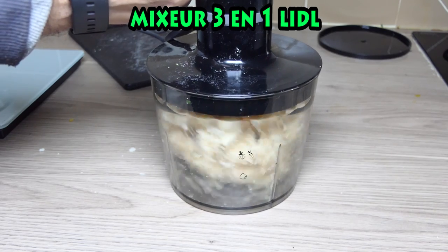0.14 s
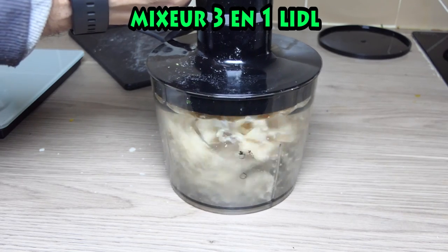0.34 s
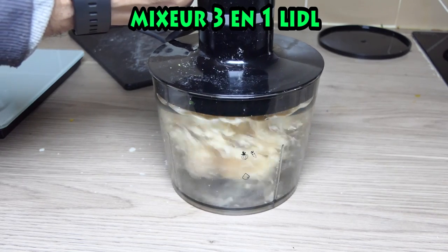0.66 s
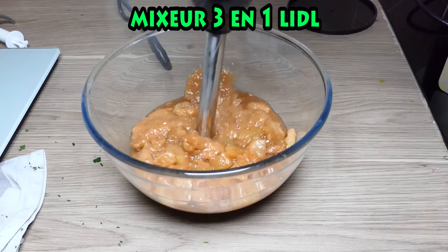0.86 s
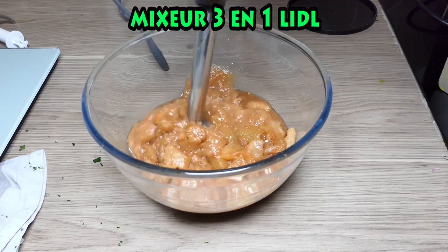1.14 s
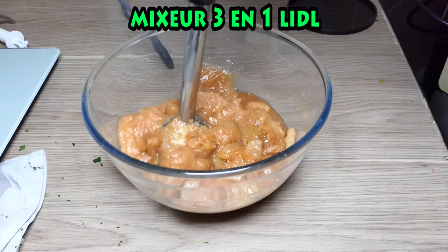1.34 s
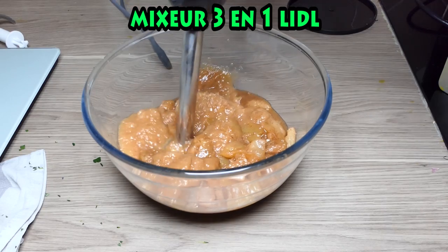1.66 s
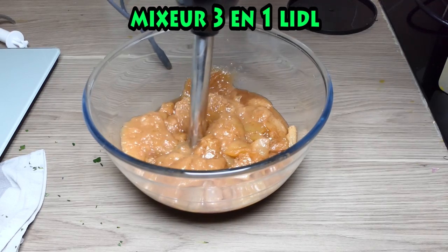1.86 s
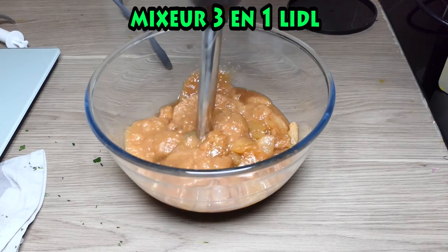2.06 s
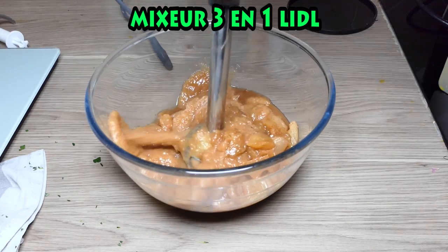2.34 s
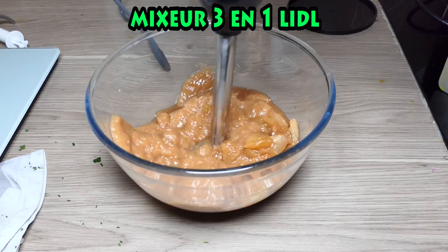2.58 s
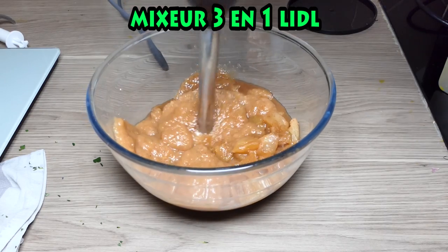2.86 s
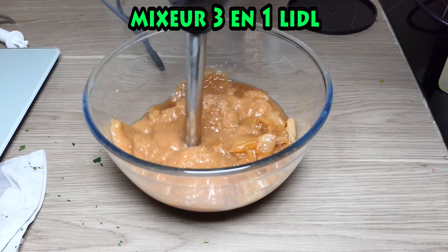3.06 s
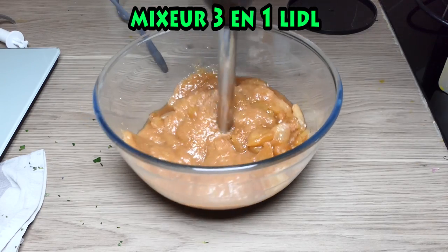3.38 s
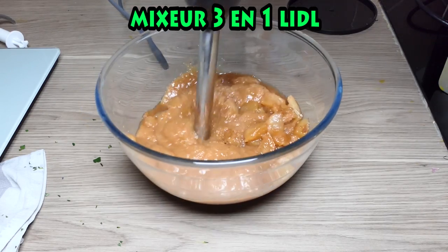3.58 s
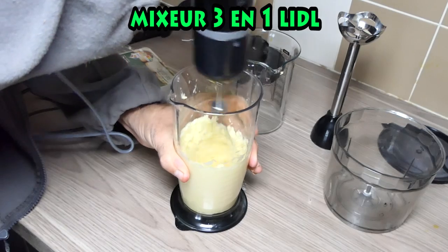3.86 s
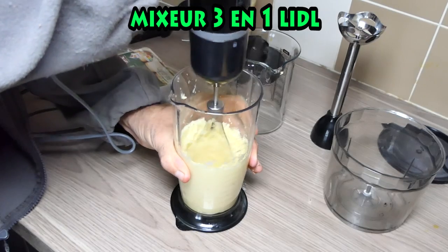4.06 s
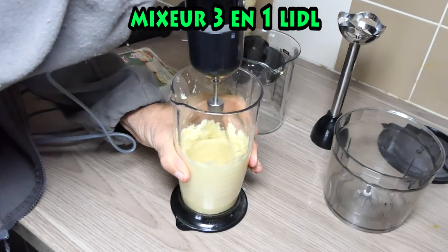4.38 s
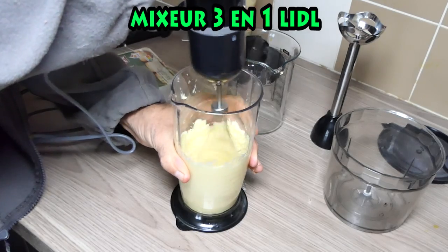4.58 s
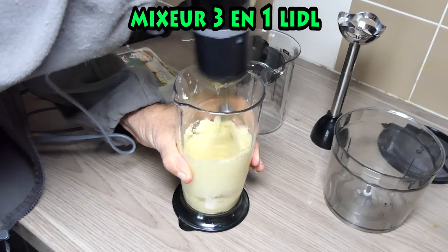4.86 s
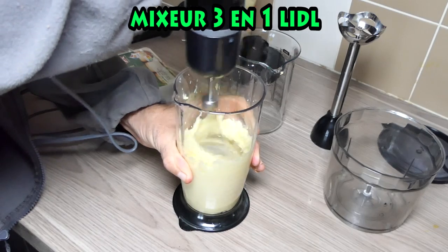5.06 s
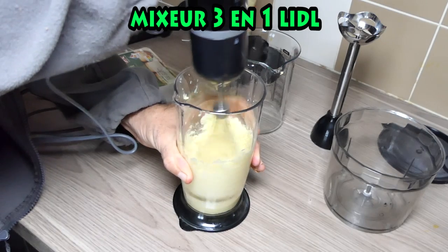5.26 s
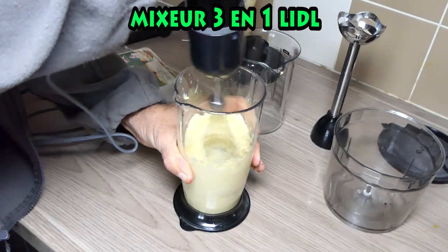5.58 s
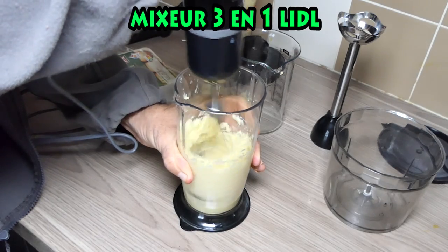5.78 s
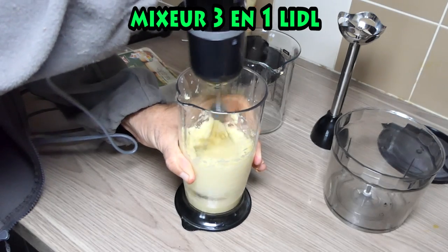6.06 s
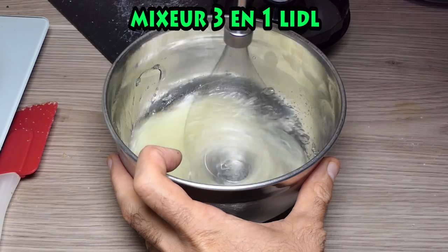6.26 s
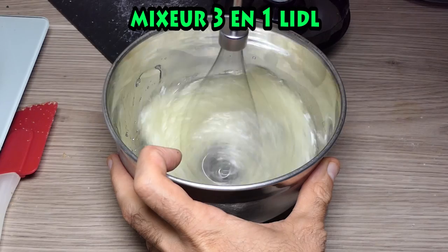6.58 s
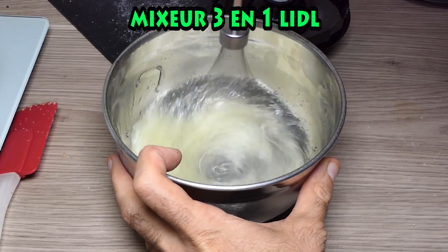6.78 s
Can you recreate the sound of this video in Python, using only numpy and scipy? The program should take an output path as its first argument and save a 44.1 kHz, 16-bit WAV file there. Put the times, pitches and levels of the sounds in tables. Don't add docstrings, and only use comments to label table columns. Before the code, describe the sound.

Food pieces clatter loudly in a plastic chopper, a hand blender grinds and spits through puree, then a geared whisk whines in a beaker and scrapes steel.

```python
import sys
import numpy as np
from scipy import signal
from scipy.fft import rfft, irfft, next_fast_len
from scipy.io import wavfile
from scipy.ndimage import minimum_filter1d, map_coordinates

SR = 44100
rng = np.random.default_rng(int(sys.argv[2]) if len(sys.argv) > 2 else 0)


def natural_amplitude(level_db):
    exponent = np.asarray(level_db, float) / 20
    return 10 ** exponent


def store_pcm(level_fs):
    pcm = np.round(np.clip(level_fs, -1, 1) * 32767).astype(np.int16)
    wavfile.write(sys.argv[1], SR, np.atleast_2d(pcm).T)


N = 305745
T = np.arange(N) / SR

# [f/Hz, width/Hz, level/dB]
GLASS_MODES = [(777, 59, -2.5), (870, 39, 1), (907, 60, -2.5), (1170, 84, -5), (1380, 126, -5),
               (1663, 84, -6), (2044, 155, -12.5)]


def chopper():
    # [f/Hz, level/dB per Hz]
    tumble_spectrum = [(35, -50), (60, -42), (227, -11.5), (550, -14.5), (897, -3.5), (1010, -8.5),
                       (1810, -5), (2330, -5.5), (2950, -5.5), (3310, -9.5), (3630, -21.5), (4920, -19),
                       (6210, -27.5), (9900, -30), (15800, -51)]
    # [f/Hz, width/Hz, level/dB]
    lid_modes = [(954, 12, -5.5), (2010, 106, -4.5), (2310, 36, 6.5), (2480, 100, 1.5), (2750, 110, -7),
                 (3230, 95, -2.5), (4600, 1200, -14), (5440, 240, -12.5)]
    # [t/s, peak level/dB, brightness over peak/dB]
    wall_hits = [(0.0443, -9.5, -25), (0.1151, -30, -11.5), (0.131, -7, -9), (0.177, -8.5, -20),
                 (0.2087, -5, -5), (0.2483, -18, -5), (0.2777, -14, -17), (0.305, -10.5, -24),
                 (0.3434, -10, -38), (0.368, -7, -2), (0.386, -7, -34), (0.4232, -15, -17),
                 (0.4354, -18, -2), (0.5053, -8, -20.5), (0.5557, -5.5, -11), (0.61, -11.5, -5),
                 (0.6655, -9.5, -41), (0.683, -8, -43), (0.756, -14, -13), (0.826, -11.5, -4),
                 (0.8684, -13.5, -24), (.006, -6.5, -13), (.0144, -13, -7.5), (.054, -11, -16),
                 (.143, -8, -17), (.152, -19, 4), (.162, -18, -17), (0.219, -14.5, -15), (.3117, -14, -7),
                 (.329, -12.5, -17), (0.401, -21, -18), (.444, -13, -20), (0.461, -13.5, -12),
                 (.484, -10.5, -14), (0.5206, -16, -2), (.531, -10.5, -14), (.541, -12, -19),
                 (.569, -13.5, -10), (0.58, -10, -6), (0.635, -10, -16), (.711, -22, -5), (.73, -18, -15),
                 (.768, -12.5, -12), (.779, -13.5, -9), (0.796, -17, -16), (0.81, -18.5, -19),
                 (.837, -16, -17)]
    # [t/s, length/s, bowl level/dB, rattle level/dB]
    load_shifts = [
        (0, 0.0068, -20, -11),
        (.044, 0.031, -19, -2.5),
        (.09, 0.026, -22.5, -10),
        (.74, 0.017, -27.5, -6),
        (.765, 0.078, -17.5, -8),
        (.84, .06, -21, -11),
    ]
    bowl_db, rattle_db = spells(load_shifts, [-19.5, -9], edge_s=0.011)
    blows = impulses([(s, db) for s, db, _ in wall_hits], gain_db=5.5)
    bright = impulses([(s, db + bright_db) for s, db, bright_db in wall_hits], gain_db=-1.5)
    lumps = natural_amplitude(0.42 * wobble(35) + 1.9 * wobble(250))

    tumble = natural_amplitude(bowl_db - 4.0) * rush(lumps, lambda hz: natural_amplitude(along(tumble_spectrum, hz)))
    shaken = natural_amplitude(bowl_db - 6.5) * lumps + 0.27 * dying(blows, 0.024)
    ring = natural_amplitude(-24.5) * rush(shaken, lambda hz: modes(lid_modes, hz))
    knock = 10 * filtered(blows, lambda hz: modes(lid_modes, hz))

    def treble(hz):
        return natural_amplitude(along(tumble_spectrum, hz) + 3.0 * np.log2(hz / 4000 + .01)) * (hz > 3500)

    rattle_level = natural_amplitude(bowl_db + rattle_db - 3.0) * lumps + 0.46 * dying(bright, 0.025)
    return tumble + ring + knock + rush(1, treble) * rattle_level


def blade():
    # [t/s, speed/turns per second]
    shaft_speed = [(.89, 202.3), (1.12, 202), (1.45, 198.3), (1.75, 199), (1.9, 201.6), (2.15, 202.6),
                   (2.7, 199), (3.2, 201.5), (3.45, 203)]
    turns = np.cumsum(curves(shaft_speed)[0]) / SR
    return under_puree(turns) + motor_whine(turns) + at_surface(turns)


def tip_passes(turns, depth_db):
    return natural_amplitude(depth_db * (np.cos(4 * np.pi * turns) + 0.095 * np.cos(2 * np.pi * turns)))


def under_puree(turns):
    # [f/Hz, level/dB per Hz]
    grind_spectrum = [(35, -86), (60, -35), (193, -18.5), (307, -13.5), (370, -15), (501, -17),
                      (603, -21.5), (762, 0.5), (1030, -17.5), (1640, -5.5), (4080, -31.5), (8810, -30),
                      (9900, -20.5), (14700, -56), (15800, -53.5)]
    # [f/Hz, width/Hz, level/dB]
    boom_modes = [(150, 7.5, -17), (263.3, 12, -7.5), (383, 18.7, 3.5), (581, 6.8, -10)]
    # [t/s, peak level/dB]
    hard_bits = [
        (1.308, -13),
        (1.47, -3),
        (1.527, -11),
        (1.595, -12),
        (1.969, -2),
        (2.089, -18),
        (2.129, -10),
        (2.825, -23),
        (3.142, -6),
    ]
    # [t/s, length/s, grind level/dB]
    foot_moves = [
        (1.235, 0.027, -19.5),
        (1.28, 0.018, -26.5),
        (2.27, 0.1, -25),
        (2.4, 0.075, -28.5),
        (3.47, 0.015, -26),
        (3.68, .06, -22),
    ]
    # [t/s, length/s, boom level/dB]
    bowl_presses = [
        (.95, 0.02, -32.5),
        (1.14, .04, -34),
        (1.22, 0.077, -43),
        (1.54, 0.12, -31.5),
        (2.1, 0.11, -35.5),
        (2.25, 0.054, -28.5),
        (2.5, 0.4, -36.5),
        (3.5, 0.077, -45.5),
        (3.72, .03, -47),
    ]
    grind_db = spells(foot_moves, [-23.5], edge_s=0.0156)[0]
    boom_db = spells(bowl_presses, [-37], edge_s=0.037)[0]
    lumps = natural_amplitude(2.4 * wobble(29.94) + 0.61 * wobble(220))

    def glass_ring(hz):
        return modes(GLASS_MODES, hz) * hz ** 2 / (hz ** 2 + 650 ** 2)

    cutting = 0.5 * rush(lumps, lambda hz: natural_amplitude(along(grind_spectrum, hz)))
    cutting = cutting + 0.97 * rush(lumps * tip_passes(turns, 2.74), glass_ring)
    grind = 0.96 * cutting + natural_amplitude(-4) * nicks(turns)
    boom = rush(1, lambda hz: modes(boom_modes, hz))
    struck = impulses(hard_bits, gain_db=32)
    thuds = filtered(struck, lambda hz: modes(GLASS_MODES, hz) / (1 + 1j * hz / 3000) ** 3)
    return natural_amplitude(grind_db) * grind + thuds + natural_amplitude(boom_db + 1.0) * boom


def nicks(turns):
    jitter_s, scatter_db = .0006, 3.5
    at = np.flatnonzero(np.diff(np.floor(turns)))
    draw = rng.standard_normal((len(at), 2))
    late = (jitter_s * SR * draw[:, 0]).astype(int)
    push = np.zeros(N)
    push[np.clip(at + late, 0, N - 1)] = natural_amplitude(scatter_db * draw[:, 1])

    def response(hz):
        snap = 1j * hz * 1300 / (1200 ** 2 - hz * hz + 1j * hz * 1300)
        return snap * (0.6 + 1.1 * modes(GLASS_MODES, hz)) / (1 + 1j * hz / 3300) ** 4

    return unit(filtered(push, response))


def motor_whine(turns):
    orders = [
        2,
        36,
        60,
        72,
        73,
    ]
    # [level/dB, phase blur/rad]
    partials = [
        (-46, .3),
        (-53.5, .35),
        (-66, .5),
        (-58, .4),
        (-61, .4),
    ]
    whine = 0
    for k, (db, blur) in zip(orders, partials):
        whine = whine + natural_amplitude(db + 3 * wobble(9.0)) * tone(k * turns, blur)
    sing_db = np.interp(T, [1.55, 1.7, 1.9, 2, 2.5, 3, 3.7], [-42, -33, -35.5, -37, -56.5, -31.5, -28.5])
    sing = natural_amplitude(sing_db) * tone(4 * turns + 0.78 * wobble(9), 0.32)
    hiss_db = np.interp(T, [2, 3], [-45, -50])
    hiss = rush(tip_passes(turns, 2.0), lambda hz: modes([(9750, 490, 0)], hz) ** 2)
    return whine + sing + natural_amplitude(hiss_db) * hiss


def at_surface(turns):
    # [f/Hz, width/Hz, level/dB]
    slurp_modes = [(2700, 480, -4.5), (3350, 185, 4.5), (3970, 520, -6), (4900, 750, -12)]
    # [f/Hz, level/dB per Hz]
    spray_spectrum = [(1470, -12), (2500, 0.5), (3940, -0.5), (4710, -0.5), (6120, -4.5), (7420, 0),
                      (9710, -2), (12700, -12), (14300, -19), (15800, -24.5)]
    # [t/s, peak level/dB, f/Hz]
    spits = [(0.9422, -29, 2630), (1.4097, -20, 2510), (1.6401, -17, 4000), (1.7205, -17, 4630),
             (1.9978, -25, 3200), (2.0268, -32, 3220), (2.2273, -20, 3640), (2.2508, -10, 7400),
             (2.4059, -14, 4100), (2.4538, -6.5, 4650), (2.5441, -23, 2650), (2.6179, -10, 3640),
             (2.6379, -2.5, 3770), (2.7042, -23, 3230), (2.9976, -16, 3310), (3.1881, -21, 3400),
             (3.3822, -15, 3360), (3.483, -24, 3300), (3.5314, -17.5, 3380), (3.585, -20, 3200),
             (3.5573, -22, 3570), (3.6346, -19, 3300), (3.665, -19, 3420), (3.7179, -16, 3580)]
    # [t/s, length/s, slurp level/dB, spray level/dB]
    gulps = [(1.23, 0.047, -34, -33.5), (1.4, 0.071, -45, -32.5), (1.63, .015, -40, -49),
             (1.715, .015, -48, -36), (1.805, 0.098, -26.5, -39), (2.25, 0.44, -35, -30),
             (2.5, 0.2, -37, -29), (2.68, 0.29, -28, -41.5), (3.01, 0.059, -30, -39.5),
             (3.17, 0.1, -26.5, -37.5), (3.405, .03, -30.5, -52), (3.49, 0.052, -30, -47),
             (3.57, 0.032, -29.5, -35.5), (3.63, 0.014, -27, -38), (3.68, 0.06, -26, -38)]
    slurp_db, spray_db = spells(gulps, [-43.5, -46.5], edge_s=0.026)

    def pocket(hz):
        return modes(slurp_modes, hz) * hz ** 4 / (hz ** 4 + 2300 ** 4)

    slurp = rush(tip_passes(turns, 2.3) * natural_amplitude(2.6 * wobble(60)), pocket)
    flung = tip_passes(turns, 3.0) * natural_amplitude(2.0 * wobble(45) + 3.5 * wobble(500))
    spray = rush(flung, lambda hz: natural_amplitude(along(spray_spectrum, hz)))
    drops = 0.7 * ticks(spits, t60=0.025, low_hz=1800, high_hz=12700)
    return natural_amplitude(slurp_db - 1.0) * slurp + natural_amplitude(spray_db + 2.0) * spray + drops


def whisk():
    # [t/s, f/Hz]
    mesh_rate = [(3.95, 2015), (3.99, 1980), (4.012, 1945), (4.026, 2000), (4.12, 1952), (4.15, 1995),
                 (4.19, 1975), (4.22, 2001), (4.35, 2003), (4.6, 1985), (4.8, 1981), (5.2, 1986),
                 (5.6, 1986), (6, 1975), (6.34, 1984)]
    ratios = [
        .1194,
        .674,
        1.12,
        3,
        4,
        5,
    ]
    # [level/dB, phase blur/rad]
    partials = [
        (-56, .3),
        (-38.5, .55),
        (-44, .4),
        (-39, 1.2),
        (-43.5, 1.3),
        (-54, 1.2),
    ]
    # [f/Hz, level/dB per Hz]
    whirr_spectrum = [(35, -80), (60, -45), (232, -24.5), (322, -23.5), (856, -17.5), (1330, -11),
                      (1800, -7), (2390, -12.5), (3300, -12.5), (4000, -10.5), (5000, -14.5), (9900, -15.5),
                      (14400, -32), (15800, -34)]
    # [f/Hz, width/Hz, level/dB]
    shell_modes = [(654, 63, -11), (1286, 72, -2), (1624, 39, 0.5), (2133, 51, -2)]
    # [t/s, peak level/dB, f/Hz]
    wire_ticks = [(3.8866, -22.5, 4010), (3.9355, -21, 4470), (4.4247, -15.5, 5970), (4.721, -15.5, 5870),
                  (4.8104, -18, 5800), (4.845, -8, 3350), (4.86, -7, 7610), (4.8792, -13, 3260),
                  (4.95, -13, 7300), (4.9668, -9, 9750), (5.0182, -16, 5800), (5.084, -25, 5950),
                  (5.1124, -14, 5280), (5.2023, -8.5, 7700), (5.489, -11, 6770), (5.5044, -6.5, 8100),
                  (5.6526, -12, 4850), (5.663, -11, 7600), (5.753, -10.5, 7100), (5.8025, -19, 7900),
                  (5.8424, -12, 9700), (5.9468, -8.5, 9450), (6.0255, -18, 5280), (6.058, -12.5, 7710),
                  (6.1674, -17, 5900), (6.2077, -11, 6900), (6.2958, -18, 6680)]
    # [t/s, length/s, mesh change/dB, octave change/dB, whirr change/dB]
    grabs = [
        (3.92, 0.028, 4, 0, 3),
        (4.0, 0.079, 0.5, -1, 1.5),
        (4.34, 0.016, 0.5, -3, -0.5),
        (4.51, .05, -3.5, 0, -0.5),
        (4.83, 0.14, 0.5, -1, -0.5),
        (5.68, .1, 0.5, -3, -1),
        (5.75, 0.012, -8, -3, -3.5),
        (6.18, 0.047, -3, -1, 1),
        (5.93, .02, 1, -1, 0),
    ]
    # [t/s, length/s, mesh change/dB]
    mesh_slips = [
        (3.975, .006, -1),
        (4.03, .01, -9),
        (4.085, .008, -5),
        (4.14, .01, -5),
                  (4.213, 0.0039, -10), (4.248, 0.021, -5), (4.301, 0.02, -13.0), (4.371, 0.024, -19.0),
             (4.486, 0.013, -17), (4.535, 0.003, -7), (4.656, 0.004, -9), (4.688, 0.019, -11.0),
             (4.753, 0.012, -3), (4.81, 0.003, -9.0), (4.845, 0.014, -10.0), (4.919, 0.012, -18),
             (4.971, 0.01, -16), (5.026, 0.01, -2), (5.069, 0.024, -16.0), (5.2, 0.0088, -18),
             (5.348, 0.04, -16.0), (5.48, 0.003, -24.0), (5.508, 0.023, -30), (5.62, 0.044, -8),
             (5.74, 0.0089, -14), (5.802, 0.003, -12), (5.91, 0.024, -17), (6.013, 0.006, -15),
             (6.056, 0.014, -21), (6.117, 0.006, -6), (6.158, 0.013, -21), (6.201, 0.015, -15.0),
             (6.275, 0.012, -10.0)]
    # [t/s, level/dB]
    bites = [(4.2, 6), (4.463, 2), (4.521, 11), (4.703, 4), (4.956, 12), (5.016, 5), (5.145, 8),
             (5.499, 17), (5.755, 21), (6.044, 15), (6.104, 14), (6.314, 21.5)]

    start_s, spin_up_s = 3.874, .048
    running = np.maximum(T - start_s, 0)
    mesh_db, octave_db, whirr_db = spells(grabs, [0, 0, 0], edge_s=0.037)
    mesh_db += -26 + spells(mesh_slips, [0], edge_s=0.0089)[0]
    octave_db += -33.5 - 4.2 * np.maximum(running - .7, 0) + 0.34 * wobble(15)
    whirr_db += -28 - 0.92 * running
    teeth = np.cumsum(curves(mesh_rate)[0] * (1 - np.exp(-running / spin_up_s))) / SR
    turns = (teeth - teeth[round(4.174 * SR)]) / 108

    def swell(depth_db):
        pattern = sum(np.cos(2 * np.pi * (k * turns + rng.random())) for k in (1, 2, 3, 4, 6, 13))
        return natural_amplitude(depth_db * unit(pattern))

    catch = np.exp(-7 * (turns % 1)) * natural_amplitude(1.2 * wobble(18)) * np.interp(T, [4.8, 5], [1, .6])
    jam = sum(natural_amplitude(db) * np.exp(-((T - s) / 0.005) ** 2) for s, db in bites) / 2
    shake = np.interp(T, [4.5, 4.8], [1.6, 1.1])
    blur_rad = np.interp(T, [4.1, 4.8], [.55, .3])
    whine = natural_amplitude(mesh_db) * swell(shake) * natural_amplitude(shake * wobble(45)) * tone(teeth, blur_rad)
    whine += natural_amplitude(octave_db + 2.5) * (1 + 1.8 * catch + jam) * swell(2.1) * tone(2 * teeth, .85)
    strain_db = np.interp(T, [3.95, 4.3], [9, 0])
    for k, (db, blur) in zip(ratios, partials):
        whine += natural_amplitude(db + strain_db * np.sign(k - 2)) * swell(2.2) * tone(k * teeth, blur)

    grain = swell(1.0) * (1 + 0.081 * catch) * natural_amplitude(1.34 * wobble(20) + 1.35 * wobble(300))
    whirr = rush(grain, lambda hz: natural_amplitude(along(whirr_spectrum, hz)))
    shell = rush(grain, lambda hz: modes(shell_modes, hz))
    whirr = whirr + np.interp(T, [4.4, 4.9], [.6, .15]) * shell
    power = np.interp(T, [3.886, 3.888, 3.915, 3.93], [0, .17, .45, 1])
    running_gears = power * (power * whine + natural_amplitude(whirr_db + 4.5) * whirr)
    return running_gears + 1.45 * ticks(wire_ticks, t60=0.042, low_hz=2250, high_hz=11400)


def steel_bowl():
    # [f/Hz, level/dB per Hz]
    sweep_spectrum = [(35, -92), (60, -62), (216, -32), (280, -19), (416, -24.5), (501, -19), (647, -23),
                      (856, -11), (1500, -5.5), (2280, -3.5), (2500, -7), (3630, -7.5), (9240, -13),
                      (14400, -28.5), (15800, -37)]
    # [f/Hz, level/dB]
    steel_tones = [(285, -54), (2250, -42), (3600, -46), (5959, -52), (11919, -62), (14900, -66)]
    # [t/s, length/s, level/dB]
    scrapes = [
        (6.84, 0.0052, -24.5),
        (6.862, 0.0081, -20.5),
        (6.9, .004, -25),
        (6.914, .004, -20.5),
    ]
    turning_db = 0.78 * np.cos(2 * np.pi * 16.0 * T) + 0.88 * np.cos(2 * np.pi * 41.0 * T)
    sweep = natural_amplitude(turning_db + 0.46 * wobble(40) + 1.2 * wobble(350))
    scrape_db = spells(scrapes, [-22], edge_s=.012)[0]
    sing = sum(natural_amplitude(db) * tone(hz * T, 0.19) for hz, db in steel_tones)
    return natural_amplitude(scrape_db) * rush(sweep, lambda hz: natural_amplitude(along(sweep_spectrum, hz))) + sing


def counter_knocks():
    # [t/s, peak level/dB, f/Hz]
    bumps = [
        (.05, -35.5, 60),
        (.891, -29, 70),
        (2.27, -43, 60),
        (2.56, -41, 60),
        (2.64, -20, 150),
        (5.209, -38, 100),
    ]
    # [t/s, peak level/dB, f/Hz]
    taps = [
        (4.527, -22, 520),
    ]
    knocks = ticks(bumps, t60=0.096, low_hz=60, high_hz=900)
    return knocks + ticks(taps, t60=0.09, low_hz=300, high_hz=1200)


def kitchen():
    # [f/Hz, level/dB per Hz]
    hush_spectrum = [(24, -52), (40, -6), (611, -3), (710, -10), (846, -9), (2880, -24.5), (4640, -27),
                     (6920, -20), (8240, -24), (15800, -25)]
    # [f/Hz, width/Hz, level/dB]
    hum_modes = [(598, 50, -10), (2820, 180, -5), (6770, 34, 4), (7160, 80, -18)]
    hush = natural_amplitude(-65.0) * rush(1, lambda hz: natural_amplitude(along(hush_spectrum, hz)))
    return hush + natural_amplitude(-71.0) * rush(1, lambda hz: modes(hum_modes, hz))


def unit(x):
    return x / np.sqrt(np.mean(x ** 2) + 1e-20)


def curves(rows):
    s, *cols = np.transpose(rows)
    return [np.interp(T, s, c) for c in cols]


def wobble(rate):
    knots = rng.standard_normal(int(N * rate / SR) + 4)
    return map_coordinates(knots, [T * rate], order=1)


def impulses(events, gain_db):
    out = np.zeros(N)
    for s, db in events:
        out[round(s * SR)] = natural_amplitude(db + gain_db)
    return out


def dying(x, t60):
    return signal.lfilter([1], [1, -natural_amplitude(-60 / t60 / SR)], x)


def spells(rows, rest, edge_s):
    s, length, *cols = np.transpose(rows)[..., None]
    held = np.clip(np.minimum(T - s, s + length - T) / edge_s + 1, 0, 1)
    held /= np.maximum(held.sum(axis=0), 1)
    return [r + (held * (c - r)).sum(axis=0) for r, c in zip(rest, cols)]


def filtered(x, response):
    m = next_fast_len(N + 8192)
    return irfft(rfft(x, m) * response(np.fft.rfftfreq(m, 1 / SR)), m)[..., :N]


def along(points, hz):
    f, v = np.transpose(points)
    return np.interp(np.log(hz + 1), np.log(f + 1), v)


def modes(peaks, hz):
    total = 0
    for k, (c, w, db) in enumerate(peaks):
        total = total + (-1) ** k * natural_amplitude(db) * 1j * hz * w / (c * c - hz * hz + 1j * hz * w)
    return total


def rush(gate, response):
    # [f/Hz, left-right likeness/0..1]
    likeness = [(60, .1), (125, .84), (300, .9), (1000, .91), (5000, .93), (8000, .9), (13000, .15)]

    def mid_side(hz):
        angle = np.arccos(np.clip(along(likeness, hz), -1, 1)) / 2
        return response(hz) * [np.cos(angle), np.sin(angle)]

    mid, side = filtered(gate * rng.standard_normal((2, N)), mid_side)
    return unit(np.array([mid + side, mid - side]))


def tone(turns, blur):
    size = np.sqrt(2) * natural_amplitude(2.7 * blur * wobble(90))
    return size * np.sin(2 * np.pi * turns + blur * (wobble(40) + wobble(300)))


def ticks(events, t60, low_hz, high_hz):
    out = np.zeros((2, N + SR))
    t = np.arange(SR // 10) / SR
    for s, db, hz in events:
        crack = rng.standard_normal(len(t)) + 0.44 * rng.standard_normal((2, len(t)))
        ring = np.sin(2 * np.pi * hz * t) * natural_amplitude(-55 * t / t60)
        knock = 0.91 * crack * natural_amplitude(-60 * t / t60) + 0.53 * ring
        start = round(s * SR)
        out[:, start:start + len(t)] += natural_amplitude(db) * knock

    def band(hz):
        return (1j * hz / (low_hz + 1j * hz)) ** 2 / (1 + 1j * hz / high_hz) ** 4

    return filtered(out[:, :N], band)


def scene():
    joins = [
        0,
        .889,
        3.732,
        6.333,
        7,
    ]
    # [f/Hz, level/dB]
    port = [(50, -10), (110, -4.5), (150, 3.5), (220, -1), (11600, -0.5), (12200, -1.5), (12800, -6.5),
            (13400, 1.5), (15500, 0.5), (15900, -25)]
    # [t/s, left minus right level/dB]
    lean = [(0.0, -2), (2.05, -0.5), (3.63, -0.5), (4.3, -2), (6.16, -2.5), (6.93, -0.5)]

    def microphone(hz):
        treble_lean_db = np.outer([1, -1], 1.4 * (hz > 11000))
        return natural_amplitude(along(port, hz) + treble_lean_db)

    sources = [chopper(), blade(), whisk(), steel_bowl()]
    heard = [filtered(x, microphone) for x in sources]
    joined = sum(x * ((T >= a) & (T < b)) for x, a, b in zip(heard, joins, joins[1:]))
    lean_db = curves(lean)[0]
    return (joined + counter_knocks() + kitchen()) * natural_amplitude([lean_db / 2, -lean_db / 2])


def low_pass(x):
    return signal.sosfilt(signal.butter(12, 15940, fs=SR, output="sos"), x)


def record(dry):
    peak_db = 20 * np.log10(np.abs(dry).max(axis=0) + 1e-9)
    over_db = np.maximum(peak_db + 10.17, 0)
    held_db = -minimum_filter1d(-over_db, size=441, origin=220)
    keep = np.exp(-1 / (0.021 * SR))
    duck_db = -1.3 * signal.lfilter([1 - keep], [1, -keep], held_db)
    return low_pass(dry * natural_amplitude(duck_db))


dry = scene()
out = record(dry)
store_pcm(out)
```